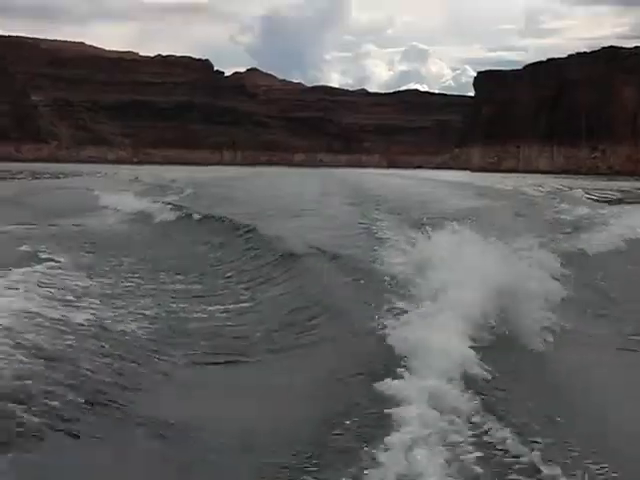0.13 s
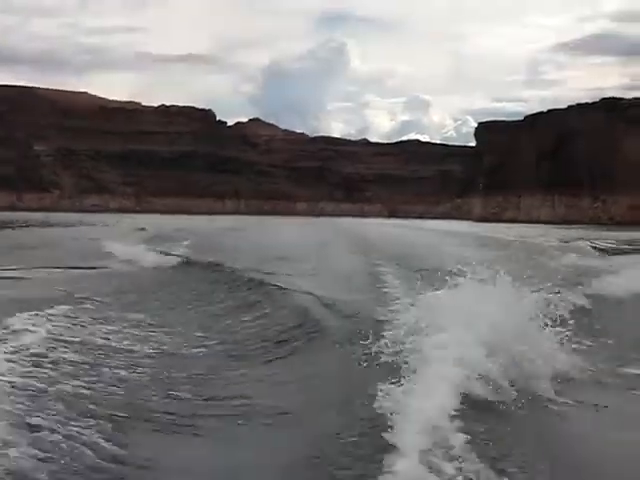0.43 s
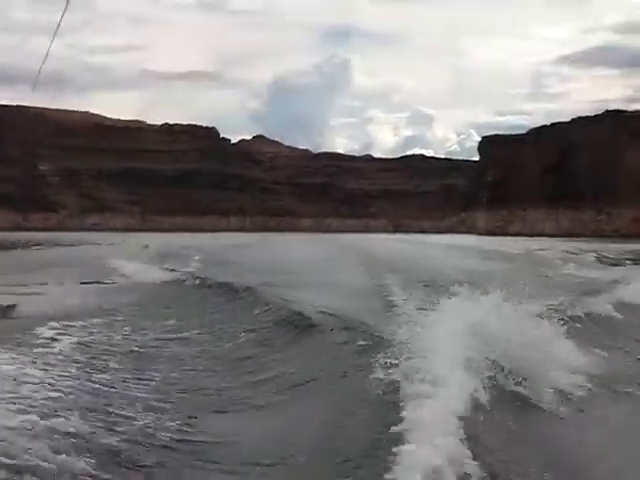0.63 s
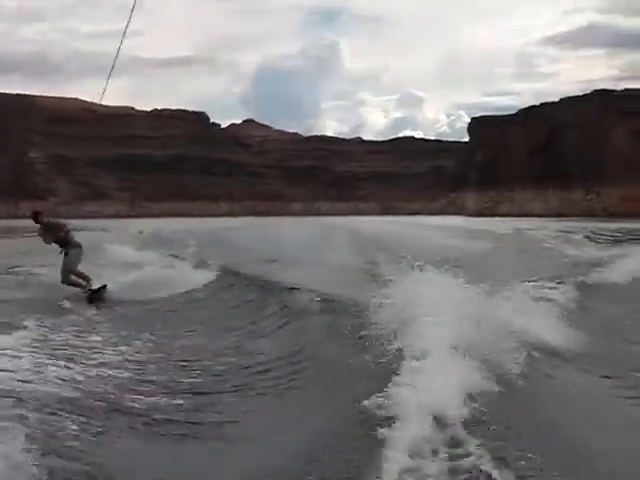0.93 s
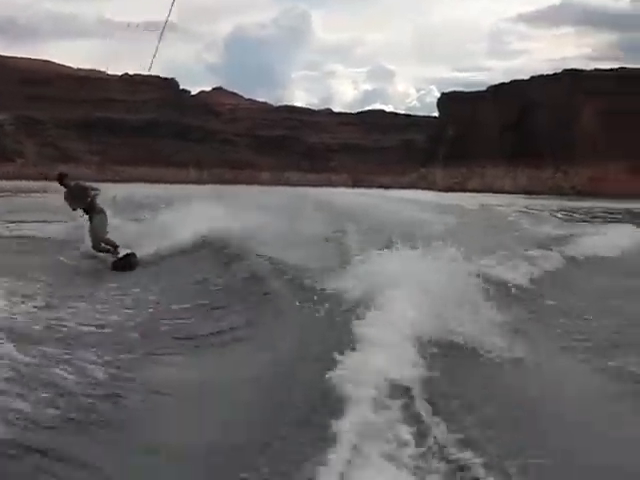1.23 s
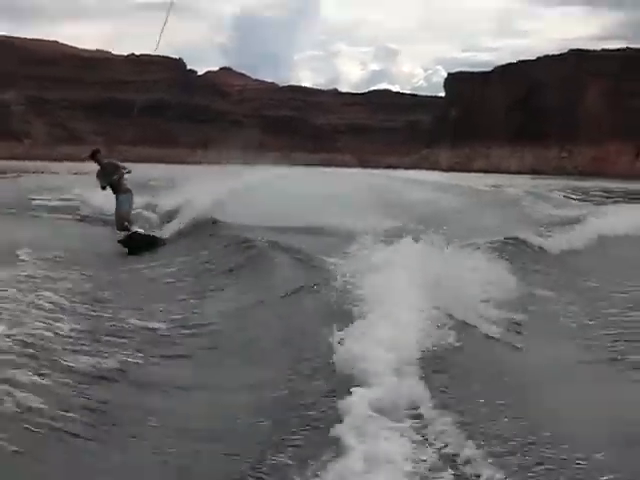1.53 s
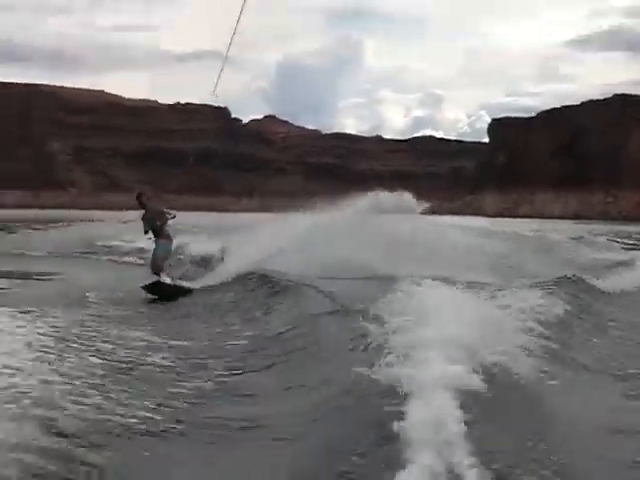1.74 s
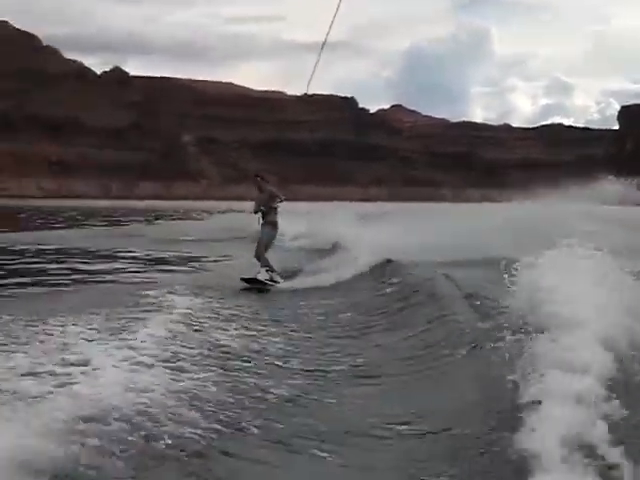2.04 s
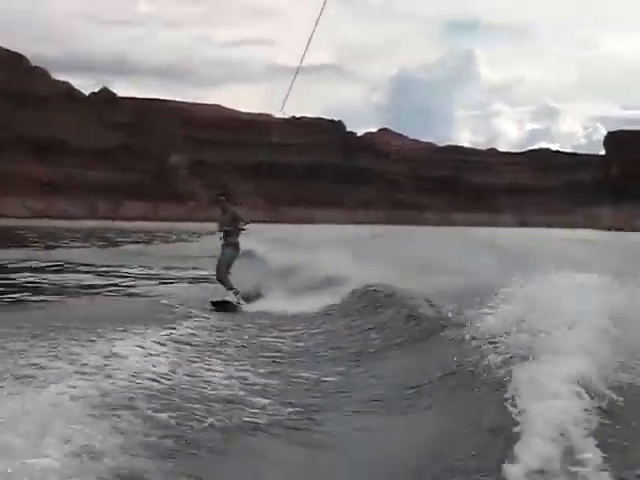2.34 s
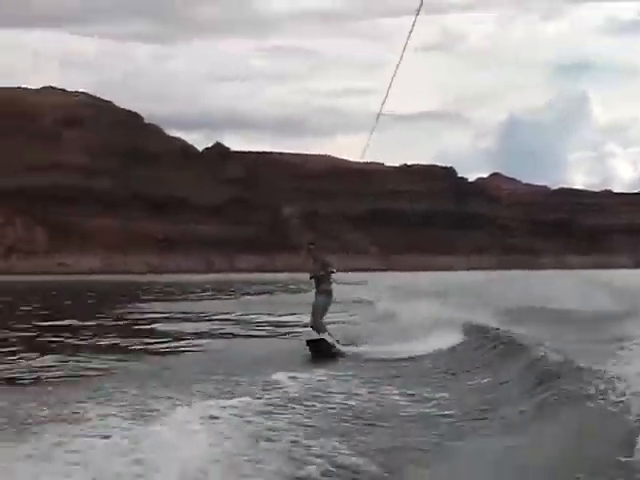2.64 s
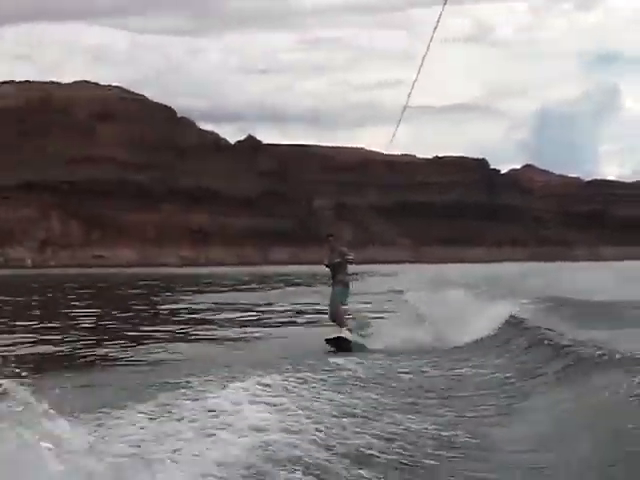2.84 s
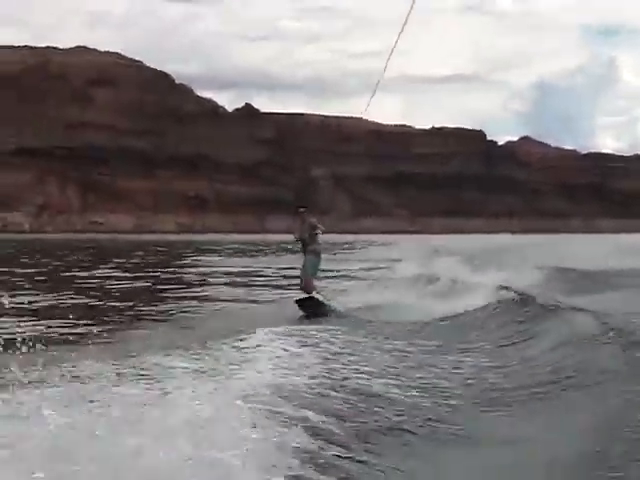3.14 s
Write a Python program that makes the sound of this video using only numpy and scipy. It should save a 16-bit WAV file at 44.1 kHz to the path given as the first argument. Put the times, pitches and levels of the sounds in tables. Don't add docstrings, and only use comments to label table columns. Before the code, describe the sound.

Steady rough motorboat drone, abruptly starting, over hissing wake, rumbling hull and buzzing metal fittings.

```python
import sys
import numpy as np
from scipy import signal
from scipy.io import wavfile

SR = 44100
rng = np.random.default_rng(int(sys.argv[2]) if len(sys.argv) > 2 else 0)


def voltage_ratio(decibels):
    exponent = np.asarray(decibels, float) / 20
    return 10 ** exponent


def wrap_up_sound(samples):
    columns = np.atleast_2d(samples).T
    tamed = np.clip(columns, -1, 1)
    steps = np.round(tamed * 32767).astype(np.int16)
    wavfile.write(sys.argv[1], SR, steps)


N = 145089

# time in seconds, level in dB.
GUST_LEVEL = [(0.26, -43), (0.35, -29), (0.4, -39), (0.47, -31), (0.52, -43), (0.55, -23), (0.7, -41),
              (0.78, -29), (0.81, -41), (1.08, -30), (1.14, -16.5), (1.18, -30), (2.88, -29.5), (2.9, -18),
              (2.98, -35), (3.05, -25), (3.14, -35), (3.28, -29)]
# frequency in Hz, density in dB per Hz.
WIND_SPECTRUM = [
    (28, -24),
    (50, -22),
    (75, 1.5),
    (100, 5),
    (125, -10),
]
# frequency in Hz, density in dB per Hz.
HULL_SPECTRUM = [
    (110, 1),
    (145, -1.2),
    (200, -3),
    (290, -4.5),
    (450, -12.5),
]
# time in seconds, level in dB.
WAKE_LEVEL = [(.26, -28.5), (.45, -29.5), (.8, -30.5), (1.2, -29.5), (1.44, -27.5), (1.54, -30.2),
              (2.3, -29.5), (2.8, -30.5), (3.28, -31.5)]
# frequency in Hz, density in dB per Hz.
WAKE_SPECTRUM = [
    (250, 1.5),
    (480, -5.5),
    (1300, -4),
    (1900, -8.5),
    (3300, -5.5),
    (5500, -8.5),
    (9000, -18.5),
    (12500, -30),
]
# time in seconds, level in dB.
SHAKE_LEVEL = [(0.26, -29.5), (0.43, -37.5), (0.53, -31), (0.56, -38), (0.6, -33), (1.82, -35.5),
               (2.03, -26.5), (2.08, -36.5), (2.97, -33), (3.0, -24.5), (3.05, -36.5), (3.28, -32)]
# resonance in Hz, width in Hz, level in dB, fade in dB per second after settling.
FITTING_MODES = [(2740, 69, -5.5, .1), (2899, 41, -3, -0.8), (2992, 42, 3.5, -0.1), (3147, 153, -7, .1),
                 (3475, 84, -9.5, -1.8), (3616, 70, -5, 1), (3805, 127, -5.5, -2.5), (4085, 60, -8.5, 3),
                 (5140, 200, -8, 0.5), (5670, 60, -10, 5), (5955, 108, -7.5, 6), (6320, 98, -17.5, -1),
                 (7450, 63, -14, -1), (8180, 340, -20, -0.5)]
# position as a fraction of the cycle, strength in dB.
VALVE_KNOCKS = [
    (0.031, -1),
    (.14, -5.5),
    (0.271, -3.5),
    (.365, -8),
    (0.521, -3),
    (.61, -12),
    (.77, 0.5),
    (.86, -10),
]
# frequency in Hz, width in Hz, level in dB.
BLOCK_MODES = [
    (698, 110, -5),
    (1000, 120, -6.5),
    (1393, 200, 0.5),
    (1610, 65, -4.5),
    (2000, 62, -4),
    (2220, 48, -2),
]
# time in seconds, pitch of the gear-tooth whine in Hz, its level in dB.
GEAR_WHINE = [
    (0.26, 938.3, -37),
    (1.3, 947.4, -34.5),
    (1.88, 938.3, -35),
    (2.92, 949.2, -36.5),
    (3.28, 948.8, -40),
]
# time in seconds, level in
# dB.
STERN_LEVEL = [(0.26, -36), (1.37, -41), (1.54, -30.5), (2.13, -41), (2.24, -35), (2.9, -40), (2.92, -53),
               (2.98, -34), (3.28, -38)]
WHINE_ORDERS = [
    5.52,
    47.1,
    167.75,
]
# level in dB, wobble in dB.
WHINE_LEVELS = [
    (-31, 2.5),
    (-46.5, -3),
    (-42, -1),
]
# time in seconds, level in dB.
BOOM_LEVEL = [(0.26, -27), (0.35, -20.5), (0.84, -23.5), (1.16, -33), (1.5, -18), (1.68, -24), (1.82, -20),
              (2.3, -28), (2.45, -23), (2.66, -24), (2.72, -18.5), (2.92, -17.5), (2.98, -23),
              (3.28, -24.5)]
# multiple of the cycle frequency, level in dB.
EXHAUST_ORDERS = [(1, -42), (2, -27), (3, -15.5), (4, -19), (5, -1), (6, 1), (7, -4.5), (8, -0.5),
                  (9, -11.5), (10, -16.5), (11, -17), (12, -21), (13, -20), (14, -17), (15, -17.5),
                  (16, -20.5), (17, -21), (18, -29), (19, -26.5), (20, -16), (21, -19.5), (22, -17),
                  (23, -22), (24, -20.5), (25, -25.5), (26, -20.5), (27, -22.5), (28, -23.5), (29, -16.5),
                  (30, -21), (31, -19.5), (32, -38), (33, -33.5), (34, -31), (35, -28), (36, -15),
                  (37, -27), (38, -28), (39, -21.5), (40, -36), (41, -15), (42, -31.5), (43, -20),
                  (44, -38), (45, -27.5), (46, -24), (47, -25), (48, -19.5), (49, -48), (50, -28),
                  (51, -34.5), (52, -16.5), (53, -31.5), (54, -24), (55, -27), (56, -29)]

TEETH = 36


def rms_one(x):
    return x / np.sqrt(np.mean(x ** 2) + 1e-20)


def in_time(rows):
    s, *columns = np.transpose(rows)
    return [np.interp(np.arange(N) / SR, s, c) for c in columns]


def drift(per_s):
    r = np.exp(-80 * np.pi * per_s / SR)
    white = rng.standard_normal(N // 40 + 2002)
    slow = signal.lfilter([1], [1, -2 * r, r * r], white)[2000:]
    slow = rms_one(slow - slow.mean())
    return np.interp(np.arange(N) / 40, np.arange(len(slow)), slow)


def resonate(x, hz, width_hz):
    r = np.exp(-np.pi * width_hz / SR)
    poles = [1, -2 * r * np.cos(2 * np.pi * hz / SR), r * r]
    return signal.lfilter([(1 - r * r) / 2, 0, (r * r - 1) / 2], poles, x + 1e-18)


def banded_noise(spectrum, patchy_db, per_s):
    hz, db = np.transpose(spectrum)
    together = drift(per_s)
    white = rng.standard_normal((2, N))
    edges = 25 * 2 ** np.arange(0, 9.2, 1 / 3)
    out = 0
    for k, (low, high) in enumerate(zip(edges, edges[1:])):
        if high < hz[0] or low > hz[-1]:
            continue
        band_filter = signal.butter(2, [low, high], "band", fs=SR, output="sos")
        band = signal.sosfilt(band_filter, white[k % 2])
        level_db = np.interp(np.log(low * high) / 2, np.log(hz), db)
        flicker_db = patchy_db * (0.67 * together + 1.13 * drift(per_s))
        out = out + voltage_ratio(level_db + flicker_db) * band
    return rms_one(out)


def tone(angle, level_db):
    return np.sqrt(2) * voltage_ratio(level_db) * np.sin(angle)


def wind_flutter():
    return voltage_ratio(in_time(GUST_LEVEL)[0] - 1.5) * banded_noise(WIND_SPECTRUM, 2, per_s=8.0)


def hull_rumble():
    return voltage_ratio(-30) * banded_noise(HULL_SPECTRUM, 2, per_s=4.4)


def wake_rush(cycle):
    rush = voltage_ratio(in_time(WAKE_LEVEL)[0] + 4.0) * banded_noise(WAKE_SPECTRUM, 0.35, per_s=9.2)
    firing = len(VALVE_KNOCKS) * cycle
    return rush * (1 + 0.05 * np.cos(firing) + 0.06 * np.cos(firing / 2))


def fittings_buzz(cycle):
    loosest, settle_s, contacts_per_s = 2, 1.7, 1500
    shake_db = in_time(SHAKE_LEVEL)[0]
    swing_db = shake_db - shake_db.mean()
    settled_s = np.maximum(np.arange(N) / SR - settle_s, 0)
    out = np.zeros(N)
    for k, (hz, width, db, fade) in enumerate(FITTING_MODES):
        hits = rng.random(N) < contacts_per_s * (1 + 0.15 * np.cos(cycle)) / SR
        sizes = voltage_ratio(2.5 * np.minimum(rng.exponential(1, N), 4)) * rng.choice([-1, 1], N)
        ring = resonate(resonate(hits * sizes, hz, width), hz, width)
        ring = rms_one(ring) * np.sqrt(width)
        patch_db = 0.26 * swing_db + 0.8 * drift(2.1)
        motion_db = swing_db if k == loosest else patch_db
        out += voltage_ratio(db - fade * settled_s + motion_db) * ring
    return voltage_ratio(shake_db.mean() + 5.5) * rms_one(out)


def valve_clatter(cycle):
    jitter_s, scatter_db = 0.0005, 2
    turns = cycle / (2 * np.pi)
    whole = np.arange(int(turns[-1]))
    knocks = np.zeros(N)
    for part, db in VALVE_KNOCKS:
        at = np.interp(whole + part, turns, np.arange(N))
        at = at + jitter_s * SR * rng.standard_normal(len(whole))
        knocks[np.abs(at).astype(int)] += voltage_ratio(db + scatter_db * rng.standard_normal(len(whole)))
    rings = np.zeros(N)
    for k, (hz, width, db) in enumerate(BLOCK_MODES):
        rings += (-1) ** k * voltage_ratio(db) * resonate(knocks, hz, width)
    return voltage_ratio(-36.5) * rms_one(rings)


def whines(cycle, gear_db):
    gear = tone(TEETH * cycle, gear_db + 1.76 * drift(8.8))
    stern_order = 10.95
    stern = tone(stern_order * cycle + 0.62 * drift(3.0), in_time(STERN_LEVEL)[0] - 1.5)
    out = gear + stern
    for order, (db, wobble_db) in zip(WHINE_ORDERS, WHINE_LEVELS):
        out += tone(order * cycle, db + wobble_db * drift(3.6))
    return out


def exhaust(cycle):
    boom_order, pipe_order = 5, 7
    out = np.zeros(N)
    for order, db in EXHAUST_ORDERS:
        k = round(order)
        if k == TEETH:
            continue
        waver_db = (0.12 - 0.1116 * db) * drift(2.6)
        swell_db = np.minimum(waver_db - waver_db.mean(), 2.5)
        level_db = in_time(BOOM_LEVEL)[0] if k == boom_order else -23 + db + swell_db
        away = k - pipe_order
        lag = 0.33 * away ** 2 - 0.375 * away ** 3
        wander = 0.09 * max(-9 - db, 0) * drift(1.5)
        out += tone(k * cycle + lag + wander, level_db)
    return out


def scene():
    gear_hz, gear_db = in_time(GEAR_WHINE)
    cycle = 2 * np.pi * np.cumsum(gear_hz / TEETH) / SR
    surroundings = wind_flutter() + hull_rumble() + wake_rush(cycle)
    machinery = fittings_buzz(cycle) + valve_clatter(cycle) + whines(cycle, gear_db)
    return (surroundings + machinery + exhaust(cycle))[None]


def band_limit(x):
    return signal.sosfilt(signal.butter(12, 12640, fs=SR, output="sos"), x)


def record(dry):
    open_s, lead_in_s, settle_gain_s, clip_top = 0.2457, 0.038, 0.1, 0.98
    x = dry - resonate(dry, 7740, 55)
    since = np.arange(N) / SR - open_s
    dull = signal.sosfilt(signal.butter(4, 230, fs=SR, output="sos"), x)
    lead_in = voltage_ratio(-35) * np.clip(1 + since / lead_in_s, 0, 1) ** 2 * dull
    settling_db = 1.5 * np.exp(-np.abs(since) / settle_gain_s)
    x = np.where(since >= 0, x * voltage_ratio(settling_db), lead_in)
    x = clip_top * np.tanh(x / clip_top)
    x = signal.sosfilt(signal.ellip(14, 0.5, 60, 12040, fs=SR, output="sos"), x)
    return band_limit(x)


dry = scene()
out = record(dry)
wrap_up_sound(out)
```